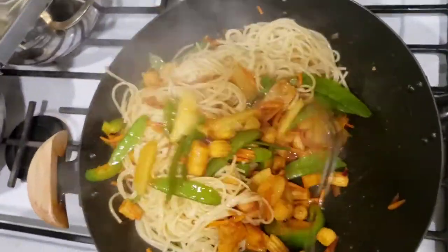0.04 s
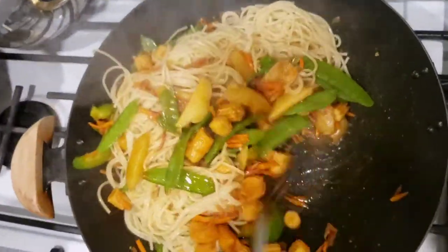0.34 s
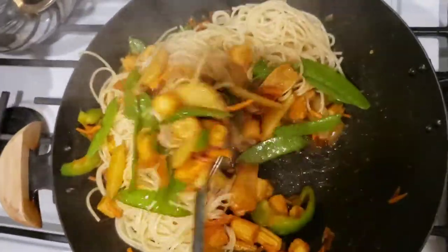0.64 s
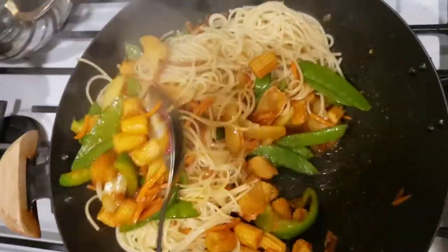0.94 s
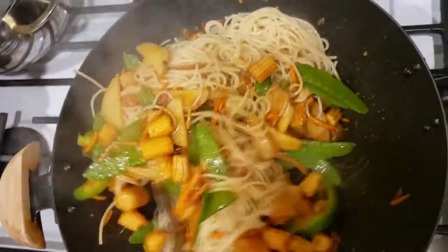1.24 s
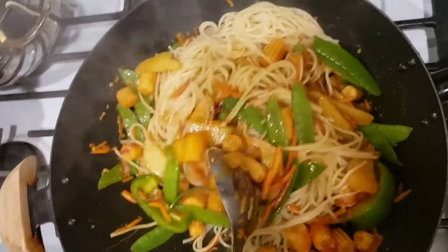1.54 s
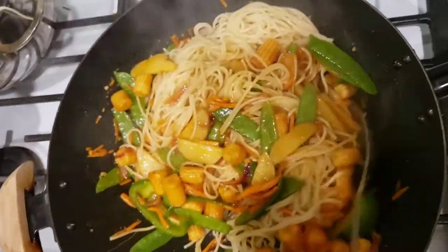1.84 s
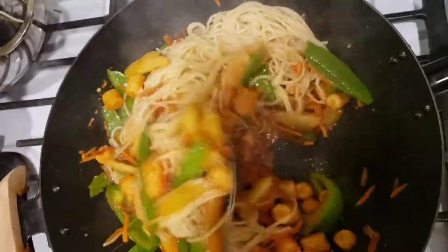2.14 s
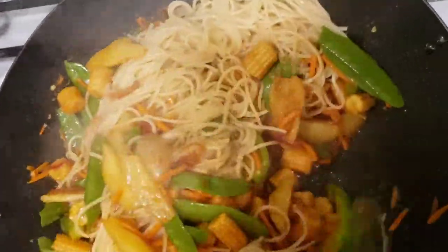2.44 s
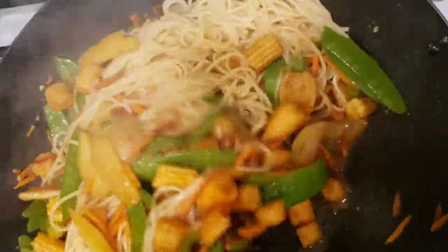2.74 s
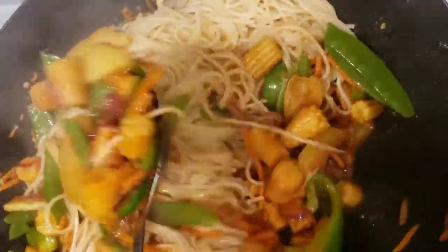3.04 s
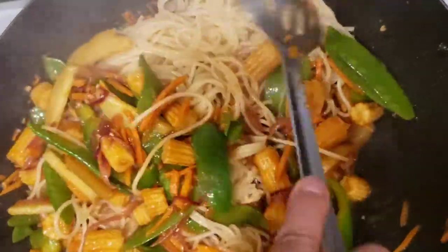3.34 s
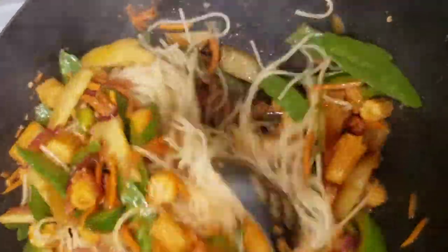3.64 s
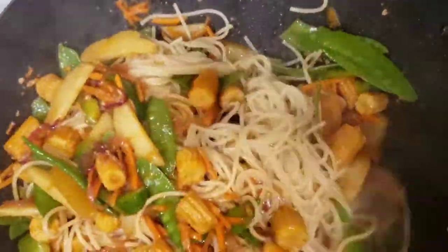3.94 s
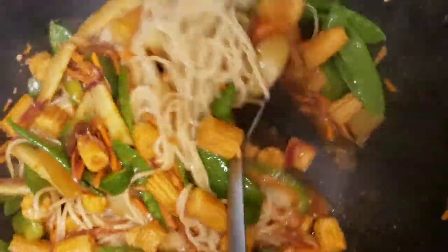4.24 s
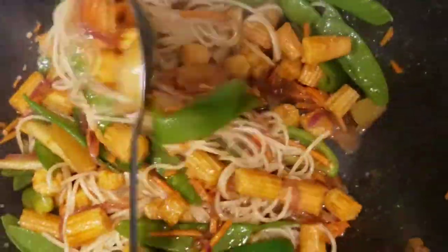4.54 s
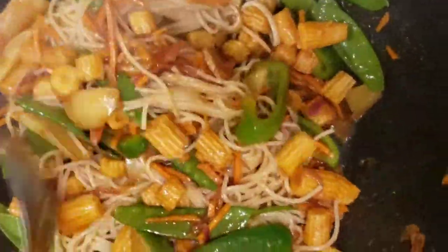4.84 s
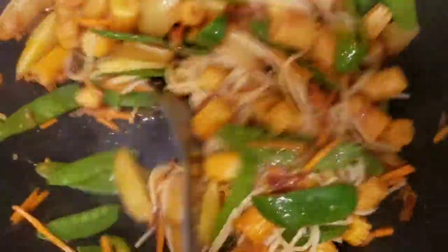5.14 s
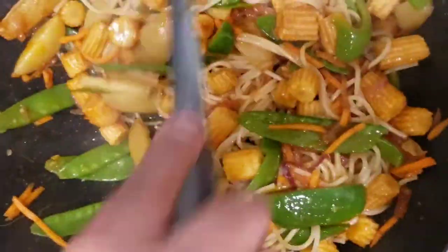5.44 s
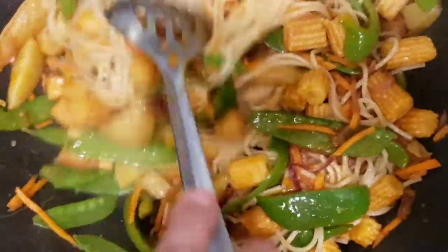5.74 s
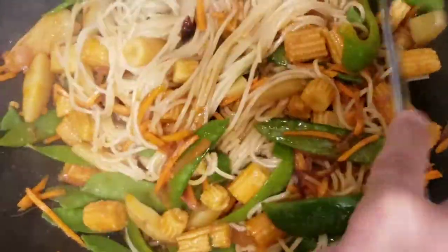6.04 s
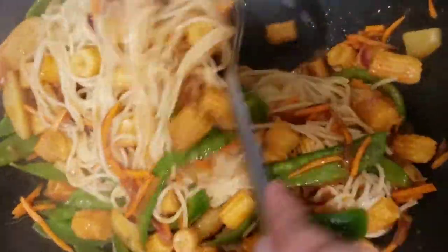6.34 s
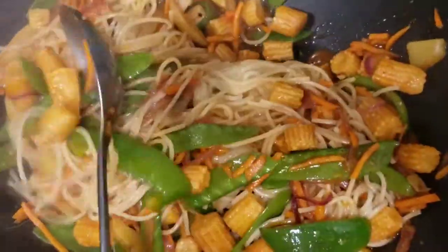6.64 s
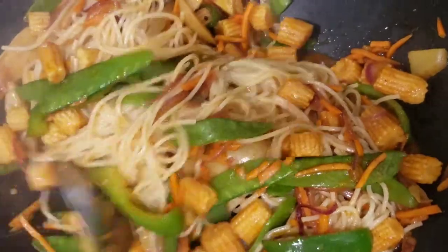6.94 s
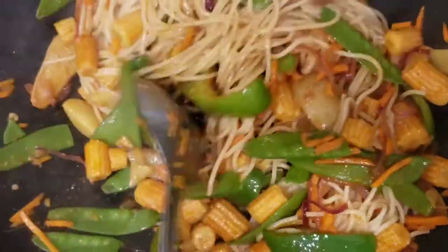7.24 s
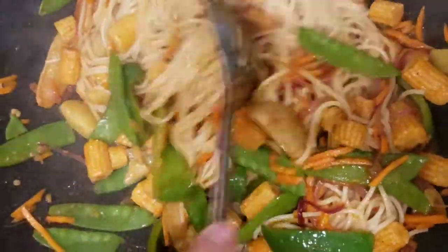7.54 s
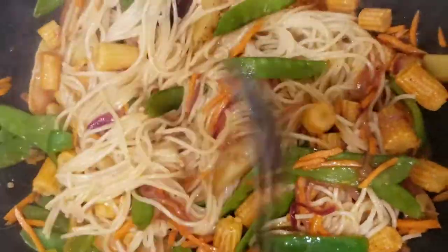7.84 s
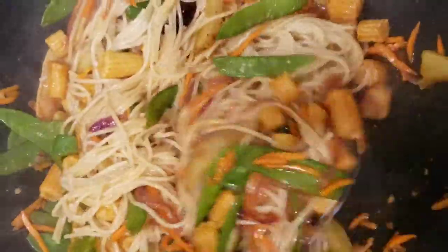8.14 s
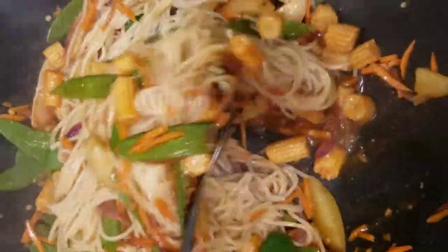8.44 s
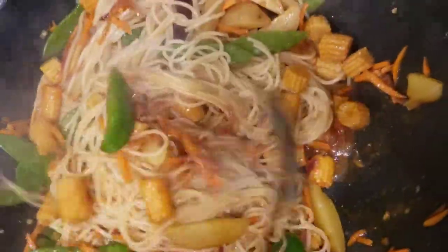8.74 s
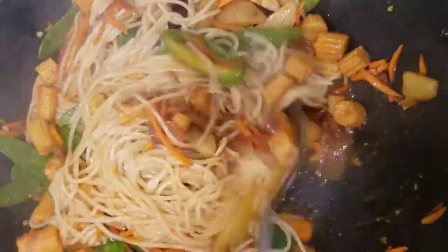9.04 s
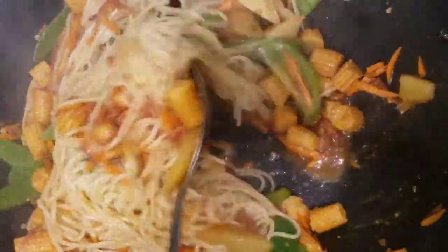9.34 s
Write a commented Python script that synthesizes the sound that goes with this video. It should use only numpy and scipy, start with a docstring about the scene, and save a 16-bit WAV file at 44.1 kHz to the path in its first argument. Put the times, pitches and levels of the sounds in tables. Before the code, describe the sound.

A metal spatula knocks and scrapes in a wok, tossing wet noodles and vegetables over a faint sizzle.

```python
"""Stir-frying noodles in a wok

A small kitchen, a stereo pair close to the gas hob, the wok a little to the left. A slotted metal
spatula tosses noodles and vegetables: it lands with a knock, scrapes brightly over bare steel, then
dulls to a drone as it slides under the food. The shoved wok rumbles on its grate; between strokes
the wet noodles squelch and the sauce sizzles faintly over the steady burner."""
import sys
import numpy as np
from scipy import signal
from scipy.fft import rfft, irfft, next_fast_len
from scipy.io import wavfile
from scipy.ndimage import map_coordinates

SR = 44100
rng = np.random.default_rng(int(sys.argv[2]) if len(sys.argv) > 2 else 0)


def log_audio(samples):
    """Write samples as a 16-bit WAV file to the path given in sys.argv[1]."""
    # one column per channel
    frames = np.atleast_2d(samples).T
    # limit to full scale, then quantise
    limited = np.clip(frames, -1, 1)
    pcm = np.round(limited * 32767).astype(np.int16)
    wavfile.write(sys.argv[1], SR, pcm)


N = 414099
TIME = np.arange(N) / SR

# Table levels are relative. The wok sounds in four bands, low to high: drone, clang, rasp, hiss.
# Spatula strokes, band levels as the blade dips under the food: t/s, length/s, time on bare steel/s,
# swell over that time/dB, drone/dB, clang/dB, rasp/dB, hiss/dB, last push/dB, drone f/Hz, rocking/dB
STROKES = [ (0.146, 0.11, 0.031, 6, -44.5, -49, -40, -43.5, 6, 550, -51),
           (0.337, 0.049, 0.019, 0, -44, -53, -48.5, -52, 6, 610, -63),
           (1.112, 0.095, .04, 2, -50.5, -57.5, -66.5, -73, -17, 540, -50),
           (1.271, 0.15, 0.035, 11.5, -36.5, -32, -33.5, -39, 3, 594, -56),
           (1.784, 0.14, 0.096, 1, -64, -63.5, -57, -59.5, -12, 520, -48),
           (2.427, .2, 0.064, 0.5, -47.5, -54, -49, -40.5, -3, 541.5, -43),
           (2.666, 0.027, .012, 1, -49, -46, -50.5, -58, 0, 588, -66),
           (3.373, 0.063, 0.061, 10, -39.5, -40.5, -43.5, -30.5, -1.5, 680, -55),
           (3.867, 0.25, 0.041, -6.5, -46, -48.5, -40.5, -38.5, 7.5, 555, -44),
           (4.936, .24, 0.032, 1.5, -37, -36, -32.5, -29.5, 5.5, 544.6, -49.5),
           (5.561, 0.07, 0.019, -1.5, -43, -41, -47, -36, -0.5, 510, -40.5),
           (6.031, 0.1, 0.045, 15, -88, -84, -54, -59, -9, 560, -53.5),
           (6.929, .176, 0.073, 3, -37, -31, -33, -36.5, 8, 640.5, -55.5),
           (7.987, 0.23, 0.062, 2.5, -40.5, -48.5, -42, -43.5, 5, 560.3, -48),
           (8.859, 0.058, 0.017, -9.5, -48, -48.5, -40.5, -47.5, -1.5, 520, -47),
           (8.912, .16, .02, 0, -33.5, -41, -40.5, -43.5, -2.5, 566, -78.5), ]
# Spots where the blade meets the wok, each with four resonances of its own:
# from t/s, their extra height/dB, sheen/dB, left over right/dB, four times f/Hz
CONTACT_SPOTS = [(0, 2.5, 4, -0.5, 1390, 3130, 4950, 7160), (1.24, 1, 0.5, 0, 1300, 1720, 4550, 6600),
                 (1.75, 0, 3.5, 0.5, 980, 1160, 4400, 6600), (2.39, -1, -3.5, 0.3, 913, 1456, 3280, 4530),
                 (3.34, -1, -1.5, 0, 820, 1360, 3150, 4120),
                 (3.84, -1.5, -2.5, -0.5, 935, 3100, 4820, 5370),
                 (4.9, 0, -1, -0.6, 1273, 2566, 3000, 5540), (5.53, 2.5, -2, -0.4, 1154, 1937, 2570, 4100),
                 (5.83, 5.5, -8, -1, 962, 1122, 1767, 3840), (6.84, -2, 1, 0.6, 1298, 1677, 2154, 6300),
                 (7.95, -2.5, 5.5, -0.3, 2936, 3540, 4410, 5020), (8.82, 6, 1.5, 0, 1400, 2210, 2940, 3300)]


def from_db(db):
    """Decibels to gain."""
    return 10 ** (np.asarray(db) / 20)


def rms_one(x):
    """Scale so that the middle of the stereo pair has rms 1."""
    return x / np.sqrt(np.mean(np.atleast_2d(x).mean(axis=0) ** 2) + 1e-20)


def at_hz(points, hz):
    """Read a curve on a log-frequency axis."""
    f, value = np.transpose(points)
    return np.interp(np.log(hz + 1e-3), np.log(f), value)


def drift(rate_hz):
    """Random wander with spread 1."""
    knots = rng.standard_normal(N // 10)
    return map_coordinates(knots, [TIME * min(rate_hz, SR / 11)], order=1) * np.sqrt(3 / 2)


def surge(s, rise_s, fall_db_per_s):
    """Gain that rises to 1 at time s, then dies away."""
    rise = np.clip(1 + (TIME - s) / rise_s, 0, 1)
    return rise ** 2 * from_db(-fall_db_per_s * np.maximum(TIME - s, 0))


def causal(spectrum, size=8192):
    """Minimum-phase impulse response with the given spectrum."""
    gain = from_db(at_hz(spectrum, np.fft.rfftfreq(size, 1 / SR)))
    cepstrum = irfft(np.log(gain))
    cepstrum[1:size // 2] *= 2
    cepstrum[size // 2 + 1:] = 0
    return irfft(np.exp(rfft(cepstrum)))


def resonate(x, modes):
    """Raise peaks (f/Hz, width/Hz, height/dB) out of a response."""
    out = x.copy()
    for hz, width, db in modes:
        r = np.exp(-np.pi * width / SR)
        poles = [1, -2 * r * np.cos(2 * np.pi * hz / SR), r * r]
        out += (from_db(db) - 1) * signal.lfilter(np.array([1, 0, -1]) * (1 - r * r) / 2, poles, x)
    return out


def through(x, response):
    """Stereo sound through an impulse response."""
    return signal.oaconvolve(x, np.atleast_2d(response), axes=-1)[:, :x.shape[-1]]


def stereo_noise():
    """White noise at the two microphones, nearly the same in the bass, less alike higher up."""
    # likeness of left and right: f/Hz, correlation
    likeness = [(100, 0.96), (620, 0.8), (1050, 0.35), (3000, 0.1), (14000, 0.6)]
    size = next_fast_len(N)
    alike = at_hz(likeness, np.fft.rfftfreq(size, 1 / SR))
    mid, side = rfft(rng.standard_normal((2, size)))
    return irfft(np.sqrt(1 + alike) * mid + np.sqrt(1 - alike) * side * [[1], [-1]], size)[:, :N]


def grains(per_s, spread_db, fade_s, bed):
    """Tiny bursts of uneven size at random moments, over a smooth bed; rms 1."""
    onsets = rng.random(N) < per_s / SR
    power = onsets * from_db(spread_db * np.minimum(rng.exponential(1, N), 4)) ** 2
    power = signal.lfilter([1], [1, -np.exp(-1 / (fade_s * SR))], power + 1e-18)
    return rms_one(stereo_noise() * np.sqrt(power / power.mean() + bed))


def kitchen(x, first_s, size=32768):
    """Dense reflections from hard, near walls reach the microphones after first_s."""
    # reverberation time: f/Hz, t60/s
    decay_times = [(150, 0.24), (550, 0.46), (1500, 0.49), (4000, 0.5), (8000, 0.39), (15000, 0.7)]
    age, response = np.arange(size) / SR, 0
    hz, white = np.fft.rfftfreq(size, 1 / SR), rfft(stereo_noise()[:, :size])
    edges = np.geomspace(80, 20000, 12)
    for low, high in zip(edges, edges[1:]):
        band = irfft(white * ((hz >= low) & (hz < high)))
        t60 = at_hz(decay_times, np.sqrt(low * high))
        response = response + band * np.exp(-np.log(1000) * age / t60)
    response *= np.clip(age / first_s - 1, 0, 1)
    return through(x, response / np.linalg.norm(response[0]))


def gas_hob():
    """The burner's steady low rush under the wok; rms 1."""
    # burner noise: f/Hz, level/dB
    spectrum = [(18, -31.5), (30, -2), (64, 4), (184, -12), (540, -11), (760, -19), (1070, -18.5),
                (1590, -35.5), (4530, -38.5), (6900, -28), (8520, -46), (14000, -30.5), (16000, -37)]
    return rms_one(through(stereo_noise(), causal(spectrum)))


def rocking(tremble_db, rise_s, fall_db_per_s):
    """Every stroke shoves the wok, which rumbles on its grate and settles to a faint tremble."""
    # rumble: f/Hz, level/dB
    spectrum = [(20, -23), (38, -17.5), (52, -1.5), (100, -8.5), (160, -9), (240, -12), (420, -10),
                (600, -19.5), (1200, -36.5), (4000, -59)]
    # resonances of the wok on its grate: f/Hz, width/Hz, height/dB
    grate_modes = [(62.6, 43, 10.5), (137, 11, 14), (199.1, 2.8, 11)]
    power = from_db(tremble_db) ** 2
    for start, *_, rock_db in STROKES:
        power += (from_db(rock_db) * surge(start + rise_s, rise_s, fall_db_per_s)) ** 2
    rumble = through(stereo_noise(), resonate(causal(spectrum), grate_modes))
    return np.sqrt(power) * rms_one(rumble)


def crackles(per_s, spread_db, cycles, pitches=14):
    """Films of sauce snap one by one, short pitched ticks scattered from left to right; rms 1."""
    out = np.zeros((2, N))
    for hz in np.geomspace(2000, 14000, pitches):
        at = np.flatnonzero(rng.random(N) < per_s / pitches / SR)
        clicks = np.zeros((2, N)) + 1e-18
        clicks[:, at] = from_db(spread_db * (2 * rng.random(len(at)) + rng.random((2, len(at)))))
        r = np.exp(-hz / (cycles * SR))
        poles = [1, -2 * r * np.cos(2 * np.pi * hz / SR), r * r]
        out += signal.lfilter(np.array([1, 0, -1]) * np.sqrt(1 - r), poles, clicks)
    return rms_one(out)


def frying(squelch_db, sizzle_db, crackle_db):
    """Sticky noodles part in clumps of clicks and tiny bubbles burst on hot steel, more at each toss."""
    # heaps of food turn over and land: peak t/s, rise/s, squelch/dB, sizzle/dB
    tosses = [(0.42, .15, -67, -68), (0.719, 0.41, -79, -70), (1.2, 0.14, -57.5, -66),
              (1.92, 0.15, -59, -68), (2.32, 0.15, -70.5, -68), (2.8, 0.48, -63, -65),
              (3.1, 0.24, -90, -69), (3.6, 0.36, -54.5, -66.5), (4.3, 0.2, -64, -66.5),
              (4.799, 0.5, -75.5, -73.5), (5.8, .14, -65.5, -70.5), (6.07, 0.09, -56, -61),
              (6.35, 0.11, -70.5, -67), (6.869, 0.053, -55.5, -59), (7.47, 0.084, -57, -57),
              (7.65, 0.055, -73, -68), (8.35, 0.33, -65, -63.5), (8.65, .2, -91, -76),
              (9.199, 0.28, -59.5, -66)]
    # wet noodles: f/Hz, level/dB
    squelch_spectrum = [(300, -13), (600, 7), (1100, 5.5), (2000, 1.5), (4000, 1.5), (6000, -9.5),
                        (9000, -21), (16000, -26.5)]
    # bubbling sauce: f/Hz, level/dB
    sizzle_spectrum = [(1500, -22), (3500, -7.5), (6500, 4.5), (8300, -8), (10500, -2.5), (13000, 5.5),
                       (16000, 0)]
    wet, hot = from_db(-82), from_db(-78)  # food lying still keeps frying
    for s, rise_s, wet_db, hot_db in tosses:
        wet = np.hypot(wet, from_db(wet_db) * surge(s, rise_s, fall_db_per_s=58))
        hot = np.hypot(hot, from_db(hot_db) * surge(s, rise_s, fall_db_per_s=53.5))
    clicks = grains(per_s=330, spread_db=4.0, fade_s=0.00076, bed=1.0) * from_db(4.4 * drift(26))
    bubbles = grains(per_s=860, spread_db=7.0, fade_s=0.00063, bed=1.0)
    ticks = crackles(per_s=120, spread_db=7.5, cycles=6.2)
    squelch = wet * from_db(squelch_db) * rms_one(through(clicks, causal(squelch_spectrum)))
    sizzle = hot * from_db(sizzle_db) * rms_one(through(bubbles, causal(sizzle_spectrum)))
    return squelch + sizzle + np.hypot(wet, hot) * from_db(crackle_db) * ticks


def pops(cycles, gain_db, size=2048):
    """Pockets of sauce burst and ring for a few cycles."""
    # wet pops in the noodles: t/s, level/dB, f/Hz
    bursts = [(0.885, -47, 6800), (1.0866, -44, 1680), (1.1967, -51, 1660), (1.211, -45, 1850),
              (1.986, -40.5, 2700), (2.1909, -44, 5570), (2.2971, -40.5, 6340), (4.2949, -42.5, 3570),
              (4.5312, -37, 11700), (4.6349, -46.5, 1840), (6.057, -34.5, 3950), (6.356, -43.5, 4140),
              (7.439, -41, 7250)]
    out, age = np.zeros((2, N + size)), np.arange(size) / SR
    for s, db, hz in bursts:
        at = int(s * SR)
        ring = np.sin(2 * np.pi * hz * age) * np.exp(-age * hz / cycles)
        puff = rng.standard_normal((2, size)) * np.exp(-age * hz / (3 * cycles))
        pop = through(puff, ring)
        out[:, at:at + size] += from_db(db + gain_db) * pop / np.abs(pop).max()
    return out[:, :N]


def spot_at(s):
    """Index of the spot that the blade touches at time s."""
    return np.searchsorted([row[0] for row in CONTACT_SPOTS[1:]], s)


def wok_responses(spot_db, spot_q):
    """How the steel rings at each contact spot: stereo impulse responses of its four bands."""
    # broad response of the steel sheet: f/Hz, level/dB
    sheet_spectrum = [(150, -6.5), (330, -7), (480, 5), (800, 2.5), (1500, -3), (2400, 1.5), (3600, -3),
                      (4700, 0), (6800, -1), (8200, -11.5), (10000, -9.5), (12500, -4.5), (15500, -8)]
    # wok and blade resonances: f/Hz, width/Hz, height/dB
    steel_modes = [(531.8, 20, 11.5), (561.2, 19, 16), (636.5, 16, 12.5), (679, 15, 9), (1172, 40, 9),
                   (1266, 44, 8.5), (1363, 16, 10), (2584, 13, 5), (2870, 70, 5.5), (4140, 37, 7),
                   (4497, 37, 11.5), (4977, 72, 7.5), (5430, 18, 4), (5700, 44, 0), (6160, 15, 2.5),
                   (6750, 7.1, 4)]
    # edges of the four bands: f/Hz
    edges = [100, 820, 1700, 3600, 18000]
    sheen_hz, sheen_width_hz = 12370, 4300
    sheet = causal(sheet_spectrum)
    filters = [signal.butter(4, band, "band", fs=SR, output="sos") for band in zip(edges, edges[1:])]
    responses = []
    for _, height_db, sheen_db, pan_db, *pitches in CONTACT_SPOTS:
        spot_modes = [(hz, hz / spot_q, spot_db + height_db) for hz in pitches]
        body = resonate(sheet, steel_modes + spot_modes)
        body = resonate(body, [(sheen_hz, sheen_width_hz, sheen_db)])
        bands = [signal.sosfilt(sos, body) for sos in filters]
        pan = from_db([[pan_db / 2], [-pan_db / 2]])
        responses.append([band / np.linalg.norm(band) * pan for band in bands])
    return responses


def stroke_controls(stroke, land_s, lift_s, ring_s=0.25):
    """Span, band gains and drone pitch of one stroke: bare steel, muffling food, a last push."""
    # fade under the food: drone, clang, rasp, hiss, each in dB per s
    muffling = [0.0, 35.0, 70.0, 125.0]
    push_lead_s, clang_lead_s, push_width_s = 0.019, 0.048, 0.025
    clang_share, pitch_rise = 0.9, 0.19
    start, length, bare_s, swell_db, *levels, push_db, hz, _ = stroke
    span = slice(int((start - land_s) * SR), int((start + length + ring_s) * SR))
    age = TIME[span] - start
    touch = np.interp(age, [-land_s, 0, length, length + lift_s], [0, 1, 1, 0])
    pressure_db = swell_db * np.minimum(age / bare_s - 1, 0)
    buried_s = np.maximum(age - bare_s, 0)
    drone, clang, rasp, hiss = [touch * from_db(db + pressure_db - fade * buried_s)
                                for db, fade in zip(levels, muffling)]
    # just before the blade lifts, the push swells or dips first the clang, then the drone
    push, early_push = [np.exp(-((age - length + lead) / push_width_s) ** 2)
                        for lead in (push_lead_s, clang_lead_s)]
    clang *= from_db(clang_share * push_db * early_push)
    drone *= from_db(push_db * push)
    return span, [drone, clang, rasp, hiss], hz * (1 + pitch_rise * push)


def scrapes(responses, rim_delay_s, rim_echo, flutter_db, drone_width_hz, drone_db, band_db):
    """Dense slips of the blade excite the wok; the rim's echo shifts as the contact point travels."""
    slips = grains(per_s=1900, spread_db=3.0, fade_s=0.00056, bed=0.5) * from_db(flutter_db * drift(130))
    lag = rim_delay_s * from_db(1.6 * drift(9))
    echo = np.array([np.interp(TIME - lag, TIME, side) for side in slips])
    slips = rms_one(slips + rim_echo * echo)
    # the pressed blade judders: a narrow band of noise around the drone pitch
    judder = drift(drone_width_hz) + 1j * drift(drone_width_hz)
    judder /= np.sqrt(np.abs(judder) + 0.14)
    out = np.zeros((2, N))
    for stroke in STROKES:
        span, gains, pitch = stroke_controls(stroke, land_s=0.004, lift_s=0.028)
        for band, gain, db in zip(responses[spot_at(stroke[0])], gains, band_db):
            out[:, span] += through(slips[:, span] * gain * from_db(db), band)
        drone = np.real(judder[span] * np.exp(2j * np.pi * np.cumsum(pitch) / SR))
        out[:, span] += from_db(drone_db) * gains[0] * drone
    return out


def knocks(responses, chatter_s, crack, crack_s, band_db, size=4096):
    """The blade cracks against the steel and chatters briefly, longer after a harder blow."""
    # blows on the wok: t/s, drone/dB, clang/dB, rasp/dB, hiss/dB
    blows = [(0.1468, -33.5, -64, -41.5, -31.5), (0.1845, -32.5, -43, -48, -54), (0.35, -44, -54, -48, -61),
             (0.557, -55.5, -78, -85, -77), (1.113, -46.5, -64, -79, -87), (1.2693, -37, -42, -72, -46.5),
             (1.784, -45, -69, -68, -44.5), (2.4263, -33.5, -46, -41, -32), (2.547, -41, -34.5, -29, -29.5),
             (2.633, -42, -34, -39.5, -44), (2.932, -57.5, -80, -85, -81), (3.661, -45, -51, -58, -66),
             (3.77, -51, -57, -79, -84), (3.866, -26.5, -32, -31, -21), (3.9646, -32, -34, -35.5, -37.5),
             (4.047, -40, -42, -37.5, -46.5), (4.107, -58, -40, -42.5, -57),
             (4.158, -50.5, -42.5, -62, -59), (4.9361, -24.5, -37, -28, -21.5),
             (5.1158, -33, -36, -41.5, -66), (5.56, -39, -40, -40.5, -48), (5.609, -37, -35.5, -42, -35.5),
             (5.643, -45, -40.5, -51, -59), (5.873, -50.5, -41.5, -67.5, -65),
             (6.111, -71, -43, -49, -58.5), (6.272, -51.5, -42, -55.5, -88),
             (6.8776, -46, -43.5, -45.5, -52.5), (6.926, -39.5, -49, -56, -40),
             (7.9844, -34, -39, -36.5, -51.5), (8.082, -43, -38, -31.5, -53),
             (8.8568, -31, -47.5, -42, -44), (8.913, -40, -34.5, -32, -42)]
    out, noise, age = np.zeros((2, N + size)), stereo_noise(), np.arange(size) / SR
    hardest_db = np.array(blows)[:, 1:].max()
    for s, *levels in blows:
        at = int(s * SR)
        chatter = chatter_s * from_db(0.13 * (max(levels) - hardest_db))
        force = np.exp(-(age / chatter) ** 2) + crack * np.exp(-age / crack_s)
        for band, db, trim_db in zip(responses[spot_at(s)], levels, band_db):
            ring = through(noise[:, at:at + size] * force, band)
            out[:, at:at + size] += from_db(db + trim_db) * rms_one(ring)
    return out[:, :N]


def scene():
    """Close on the wok, a little left of centre, with the hob beneath and the room well behind."""
    # a knock rings its spot's resonances strongly, a sliding blade less so
    free = wok_responses(spot_db=10.0, spot_q=20.0)
    pressed = wok_responses(spot_db=4.0, spot_q=27.0)
    wok = knocks(free, chatter_s=0.015, crack=3.6, crack_s=0.0004, band_db=[-8.5, -14.0, -12.5, -8.5])
    wok += scrapes(pressed, rim_delay_s=0.0022, rim_echo=0.7, flutter_db=2.07,
                   drone_width_hz=60, drone_db=-2.0, band_db=[-8.0, -3.5, -6.0, -1.5])
    wok += pops(cycles=4.8, gain_db=-3.5)
    wok += frying(squelch_db=-3.5, sizzle_db=1.0, crackle_db=-13.0)
    rumble = rocking(tremble_db=-68.0, rise_s=0.023, fall_db_per_s=47.5)
    hob = from_db(-67.5) * gas_hob()
    room = from_db(-10.5) * kitchen(wok, first_s=0.0028)
    return (wok + room) * from_db([[1.7], [-2.1]]) + (rumble + hob) * from_db([[0.8], [-0.8]])


def record(dry):
    """The recorder cuts the top of the treble steeply."""
    cutoff_hz = 15800
    return signal.sosfilt(signal.ellip(10, 0.2, 80, cutoff_hz, fs=SR, output="sos"), dry)


dry = scene()
out = record(dry)
log_audio(out)
```